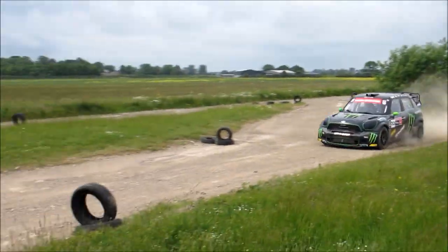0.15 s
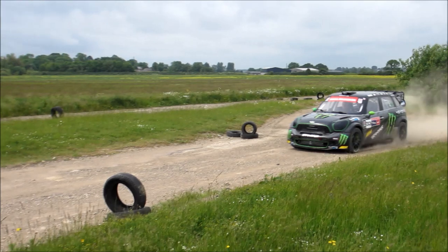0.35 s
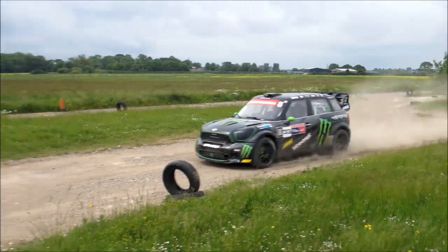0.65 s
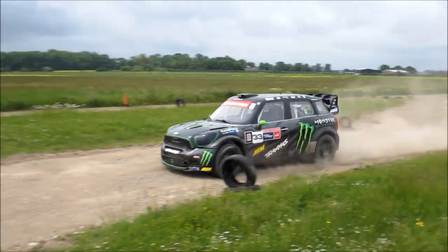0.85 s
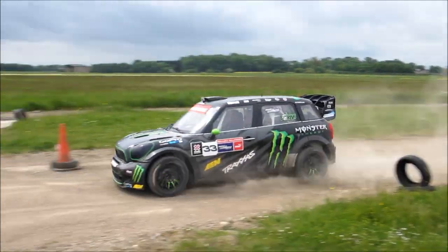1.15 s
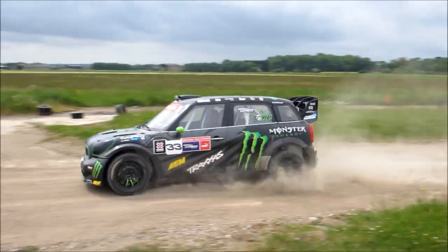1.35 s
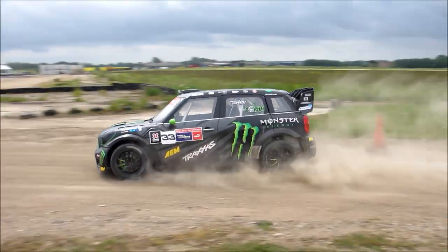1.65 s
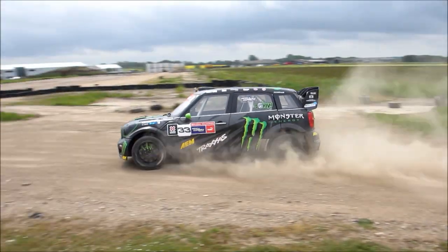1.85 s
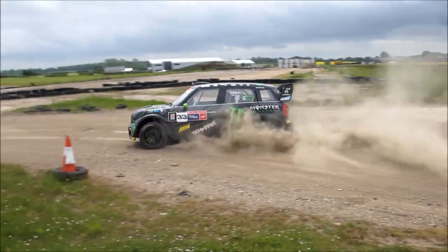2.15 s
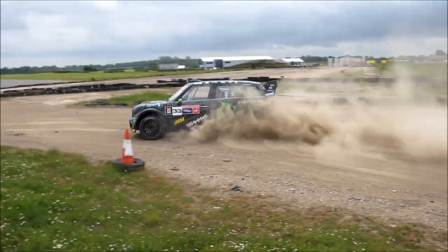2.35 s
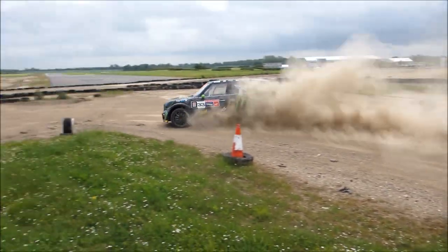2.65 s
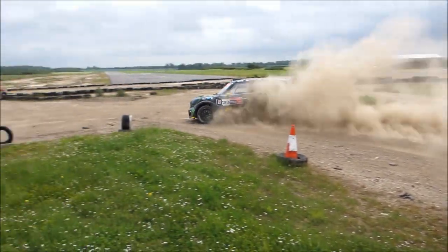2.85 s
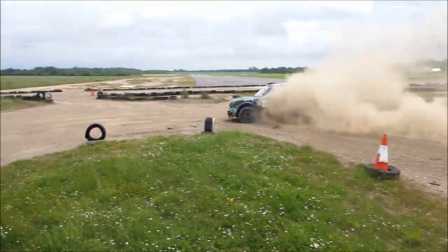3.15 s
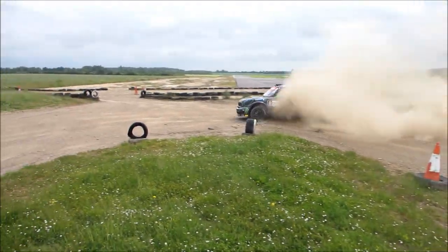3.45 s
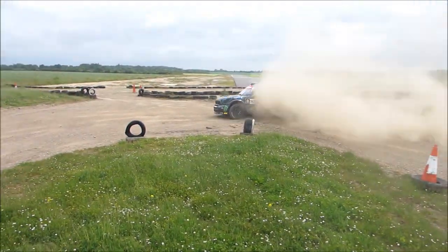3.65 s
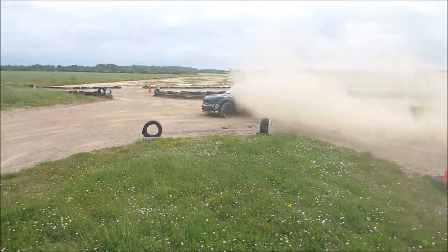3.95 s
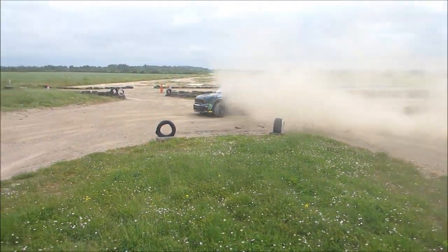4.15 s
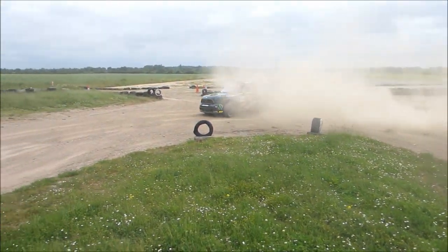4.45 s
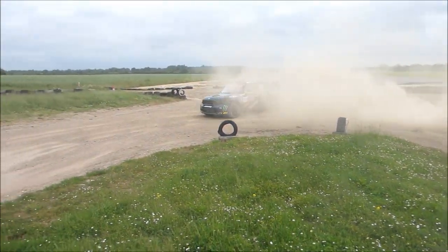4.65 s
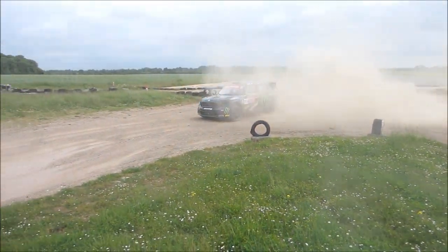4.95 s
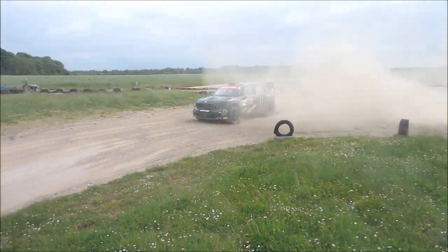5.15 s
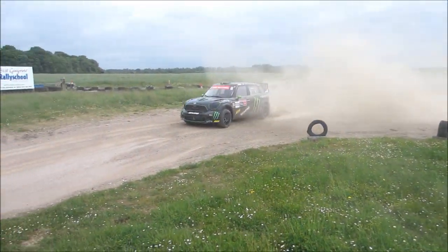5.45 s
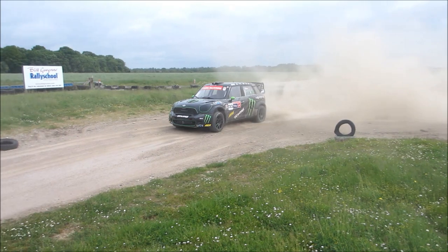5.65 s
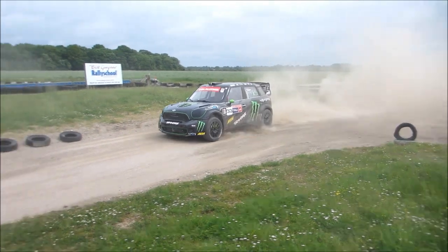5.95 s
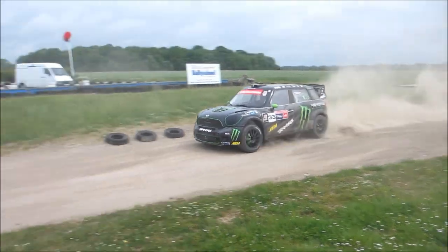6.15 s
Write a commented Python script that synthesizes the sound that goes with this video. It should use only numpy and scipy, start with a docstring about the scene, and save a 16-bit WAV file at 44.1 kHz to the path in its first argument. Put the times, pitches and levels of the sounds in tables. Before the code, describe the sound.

Outdoors on an open gravel track, a small camera microphone is buffeted by low, thumping wind throughout, strongest at the start and in sudden gusts. A rally car arrives with an uneven, raspy engine, rising at about 0.4 s with a faint high turbo whistle and grinding stones. From 1.1 to 1.9 s it lifts off: pitch sags under a dense volley of sharp exhaust pops and crackles, with a tiny thin squeal near 1.35 s. A throttle blip rasps at 1.9-2.25 s, then revs fall, with scattered pops and another squeal around 2.5-2.65 s. A second barking blip peaks at 3.2-3.4 s and drops away by 3.8 s, where a dry knock sounds. The engine catches low, hums steadily past 4 s, with small knocks at 4.6-5.2 s, then climbs in pitch and grows boomier and raspier to 6.3 s over light gravel crunch.

```python
"""Rally car on a gravel bend

A car slides round a gravel bend, lifts off with exhaust pops, blips its throttle twice and pulls away.
Firing pulses and fuel bursts excite the exhaust resonances, over a low boom and the noise of a gas jet.
Coloured grains make the gravel, wavering sines the squeals and turbo whistle, struck resonances the knocks.
A small camera on the verge hears it through two close ports; gusts buffet them in opposite senses."""
import sys
import numpy as np
from scipy import signal
from scipy.fft import rfft, irfft
from scipy.io import wavfile
from scipy.ndimage import uniform_filter1d, minimum_filter1d

SR = 44100
rng = np.random.default_rng(int(sys.argv[2]) if len(sys.argv) > 2 else 0)


def file_out(sig):
    """Save sig as 16-bit WAV at sys.argv[1]."""
    # one column per channel
    cols = np.atleast_2d(sig).T
    # limit, then scale
    lim = np.clip(cols, -1, 1)
    pcm = np.round(lim * 32767).astype(np.int16)
    wavfile.write(sys.argv[1], SR, pcm)


N = 277815  # length [samples]


def undb(db):
    """Decibel law: level [dB] to amplitude ratio."""
    return 10 ** (np.asarray(db) / 20)


def unit(x):
    """Normalisation to an rms of 1."""
    return x / np.sqrt(np.mean(x ** 2))


def curves(rows):
    """Linear interpolation in time: each column of a table, one value a sample."""
    s, *columns = np.transpose(rows)
    return [np.interp(np.arange(N) / SR, s, column) for column in columns]


def over_hz(rows):
    """Interpolation over log frequency: each column of a table, one value a transform bin."""
    hz, *columns = np.transpose(rows)
    log_bins = np.log(np.arange(N // 2 + 1) * SR / N + 1)
    return [np.interp(log_bins, np.log(hz), column) for column in columns]


def colour(x, rows, outside_db=-40):
    """Linear filtering by a spectrum table, falling away an octave beyond both ends; rms 1."""
    below = (rows[0][0] / 2, rows[0][1] + outside_db)
    above = (rows[-1][0] * 2, rows[-1][1] + outside_db)
    gain_db = over_hz([below, *rows, above])[0]
    return unit(irfft(rfft(x) * undb(gain_db), N))


def ring(x, hz, width_hz):
    """Second-order resonance, gain 1 at the centre."""
    return signal.lfilter(*signal.iirpeak(hz, hz / width_hz, fs=SR), x)


def walk(rate):
    """Bounded random modulation: levels held 1 / rate s and smoothed twice, spread near 1."""
    hold = int(SR / rate)
    steps = np.repeat(rng.standard_normal(N // hold + 1), hold)
    slewed = uniform_filter1d(uniform_filter1d(steps, hold), hold)[:N]
    return np.tanh(slewed) * 2.54


def grains(rate, spread_db):
    """Shot noise: scattered clicks of either sign, a few much larger than the rest."""
    struck = rng.random(N) < rate / SR
    return struck * rng.standard_normal(N) * undb(spread_db * rng.exponential(size=N))


# wind on the ports, before gusts: (time [s], rumble level [dB], flutter level above rumble [dB])
WIND = [(0.0, -9.5, -9), (.3, -16, -14), (.6, -15.5, -8.5), (1.0, -12, -5), (1.2, -14, -30),
        (1.8, -22.5, -8), (1.95, -11, -18), (2.17, -26, -2), (2.4, -24, -41), (2.7, -14.5, -16),
        (3.0, -18, -44), (3.3, -14, -24), (3.52, -21, -48), (3.8, -15.5, -15), (4.5, -20.5, -15),
        (4.75, -14.5, -11), (5.3, -16, -6.5), (5.8, -13, -7), (6.05, -21.5, -13), (6.3, -29, -23)]
# low eddy noise: (frequency [Hz], relative density [dB per Hz])
RUMBLE = [(25, -8.5), (50, -8.5), (90, 5.5), (180, 0), (280, 0), (450, -42)]
# higher eddy noise: (frequency [Hz], relative density [dB per Hz])
FLUTTER = [(250, 3), (450, 13.5), (700, 8), (1200, -1.5), (1900, -21)]
# sudden gusts: (time [s], rumble rise [dB], half length [s])
GUSTS = [(1.406, 7, 0.051), (2.26, 14, 0.04), (3.057, 7, 0.021), (4.006, 6.5, 0.064), (4.336, 4.5, 0.05),
         (4.566, 12.5, 0.016), (4.95, 6.5, 0.021), (6.046, 6, 0.043)]


def wind():
    """Turbulent pressure: a faster eddy passes sooner, so it is higher, louder and has more flutter."""
    flutter_per_gust_db, restless_db = 0.67, 1.2
    rumble_db, flutter_db = curves(WIND)
    t = np.arange(N) / SR
    gust_db = sum(db * np.exp(-((t - s) / half) ** 2) for s, db, half in GUSTS)
    gust_db = gust_db + restless_db * walk(12)  # small lulls and swells in between
    rumble_db = rumble_db + gust_db
    flutter_db = flutter_db + flutter_per_gust_db * gust_db
    eddy, steady = walk(80), 1.1
    speed = 2 ** (0.5 * eddy)
    place = np.cumsum(speed / speed.mean()) % (N - 1)  # noise read at the speed of the eddy
    thumps = np.interp(place, np.arange(N), colour(rng.standard_normal(N), RUMBLE))
    thumps = thumps * unit(undb(eddy))
    rumble = unit(thumps + steady * colour(rng.standard_normal(N), RUMBLE))
    flutter = colour(grains(1500, 1.6), FLUTTER) * unit(undb(1.2 * eddy + 0.6 * walk(25)))
    return undb(rumble_db) * (rumble + undb(flutter_db) * flutter)


def whine(rows, waver_hz, flicker_db, flicker_rate=55.1):
    """Phase integration: a thin tone of wavering pitch and flickering level, silent outside its table."""
    before = (rows[0][0] - 0.01, rows[0][1], -130)
    after = (rows[-1][0] + 0.009, rows[-1][1], -130)
    hz, db = curves([before, *rows, after])
    level = np.sqrt(2) * undb(db + flicker_db * walk(flicker_rate))
    return level * np.sin(2 * np.pi * np.cumsum(hz + waver_hz * walk(170)) / SR)


# faint turbo whistle, one list a glide: (time [s], frequency [Hz], mean level [dB])
WHISTLES = [
    [(.33, 13150, -68), (.42, 13200, -56), (.71, 13480, -64), (.87, 13100, -67), (1.08, 13000, -72)],
    [(4.5, 8300, -83), (5.3, 8770, -91), (5.7, 9502, -89), (6.1, 10530, -65), (6.3, 11030, -75)],
]


def turbo_whistle():
    """Gliding tones: each faint whistle is a single sine without harmonics."""
    return sum(whine(rows, waver_hz=40, flicker_db=2) for rows in WHISTLES)


# thin high squeals, one list a squeal: (time [s], frequency [Hz], mean level [dB])
SQUEALS = [
    [(1.34, 11100, -76), (1.353, 11040, -40.5), (1.385, 11036, -64)],
    [(2.495, 10790, -80), (2.515, 10650, -41), (2.54, 10510, -66), (2.65, 10750, -46.5),
     (2.665, 10850, -92)],
]


def squeals():
    """Brief pure tones: each squeal is a single sine that swells and dies."""
    return sum(whine(rows, waver_hz=50, flicker_db=2.5) for rows in SQUEALS)


# short dry knocks: (time [s], nominal peak level [dB])
KNOCKS = [(3.8066, -14), (4.565, -28.5), (4.9506, -27), (5.06, -19.5), (5.1666, -21)]


def knocks():
    """Impulse response: a click rings two damped resonances of a stiff panel for a few cycles."""
    s, peak_db = np.transpose(KNOCKS)
    clicks = np.zeros(N)
    clicks[(s * SR).astype(int)] = undb(peak_db) * SR / (2 * np.pi * 900)
    return 2 * ring(ring(clicks, 1100, 560), 1300, 480)


# tyres on loose stone, before gains: (time [s], crunch level [dB], spray level [dB])
GRAVEL = [(0, -52.5, -64), (.42, -44.5, -61), (1.05, -37.5, -59.5), (1.2, -48, -68), (1.8, -42.5, -74),
          (2.05, -37, -63.5), (2.33, -51.5, -70.5), (3.0, -51.5, -77.5), (3.3, -45.5, -66),
          (3.5, -53.5, -74.5), (4.2, -51, -78.5), (5.1, -56, -77.5), (5.7, -48.5, -70.5), (6.3, -49, -63)]
# stones grinding: (frequency [Hz], relative density [dB per Hz])
CRUNCH = [(200, 18), (800, 16), (1290, 6.5), (1480, 2.5), (3200, -8.5), (5000, -24)]
# stones pattering: (frequency [Hz], relative density [dB per Hz])
SPRAY = [(4000, -8.5), (10000, -8), (13500, -3.5), (15500, -17)]


def gravel(crunch_gain_db=11):
    """Granular impact noise: stones grind under the tyres and patter against the body."""
    crunch_db, spray_db = curves(GRAVEL)
    surge = walk(14)  # shared by both
    crunch_db = crunch_db + crunch_gain_db + 0.7 * surge + 1.2 * walk(37)
    spray_db = spray_db + 0.75 * surge + 0.45 * walk(21.85)
    crunch = colour(grains(3000, 1.5), CRUNCH) * undb(crunch_db)
    spray = colour(grains(5400, 0.36), SPRAY) * undb(spray_db)
    return crunch + 1.64 * spray


# exhaust resonances:
# (frequency [Hz], width [Hz], gain heard from behind [dB], gain heard from the front [dB])
PIPE = [(362.5, 86, 8.5, -1.5), (472.5, 120, 10, 3.5), (708, 119, 6.5, -4.5), (878, 43, 1, 1.5),
        (1067, 230, -4, -7.5), (1254, 68, -2, -4)]


def pipe(x, gains_db):
    """Modal sum: resonances of alternating sign ring; the silencer stops what lies above them."""
    rung = 0
    for k, (hz, width_hz, *_) in enumerate(PIPE):
        rung = rung - (-1) ** k * undb(gains_db[k]) * ring(x, hz, width_hz)
    return signal.sosfilt(signal.ellip(4, 1, 30, 1350, fs=SR, output="sos"), rung)


# jet at the tailpipe: (frequency [Hz], relative density [dB per Hz])
GAS = [(1500, 20), (2400, 15.5), (2850, 14.5), (3500, 4.5), (4500, -2), (9000, -15)]


def gas_jet(x):
    """Jet noise: x takes the broad spectrum of gas leaving the tailpipe; rms 1."""
    return colour(x, GAS)


# unburnt fuel going off in the exhaust: (time [s], blast peak level [dB], crack level before filter [dB])
POPS = [(0.958, -13.5, -61), (1.15, -16, -67), (1.213, -20.5, -61), (1.235, -13.5, -69),
        (1.271, -13.5, -63), (1.287, -17.5, -61), (1.328, -21.5, -63), (1.368, -16, -63),
        (1.39, -14.5, -62), (1.41, -14.5, -74), (1.444, -16.5, -58.5), (1.457, -13.5, -91),
        (1.501, -16, -58.5), (1.547, -13, -60), (1.57, -12.5, -65), (1.592, -13, -63.5), (1.637, -19, -64),
        (1.662, -13, -60), (1.685, -12.5, -64), (1.732, -10.5, -56.5), (1.757, -13.5, -57),
        (1.782, -12.5, -59), (1.823, -14.5, -53.5), (1.839, -15.5, -71), (1.865, -25, -65),
        (1.878, -13, -60), (2.48, -29, -92), (2.593, -15.5, -60.5), (2.84, -27.5, -78), (2.869, -20, -72),
        (2.897, -18, -69), (2.938, -27, -83), (2.981, -23, -63.5), (3.051, -16.5, -78), (3.069, -19.5, -73),
        (3.078, -21, -80), (3.223, -21.5, -64), (3.306, -54, -58), (3.349, -12, -87), (3.552, -22, -73),
        (3.577, -17, -88), (3.76, -24, -73), (4.034, -20.5, -87), (4.103, -23, -100)]


def pops():
    """Transient excitation: a pull, its pipe echo and a ragged burst ring the exhaust, with gas and crack."""
    burst_s, tail_s, crack_s, echo_s, pull_s = 0.004, 0.017, 0.0083, 0.00258, 0.0001
    tail_db, echo_db, thud_db, body_db = -16, 0, 0, 13
    gas_db, bright_db, gas_follows = -17, -52, 0.7  # brighter cracks bring more gas
    front = 26  # size of the pull against the ragged noise
    blast, jet, crack = np.zeros((3, N))
    t = np.arange(SR // 14) / SR
    pull = np.exp(-t / pull_s)
    fade = np.exp(-t / burst_s) + undb(tail_db) * np.exp(-t / tail_s)
    crack_fade = np.exp(-t / crack_s) + 0.76 * np.exp(-t / tail_s)
    dull = signal.butter(4, 1500, fs=SR, output="sos")  # the tailpipe's main ring carries no treble
    behind_db = np.transpose(PIPE)[2]
    for s, peak_db, crack_db in POPS:
        i = int(s * SR)
        here = slice(i, i + len(t))
        noise = rng.standard_normal((3, len(t)))
        # each pop starts elsewhere along the pipe, so its echo delay [samples] differs
        late = int(echo_s * 2 ** (0.11 * np.tanh(noise[0, -1])) * SR)
        burst = noise[0] * fade + front * (pull + undb(echo_db) * np.roll(pull, late))
        thud = undb(thud_db) * ring(burst, 109, 53)
        body = undb(body_db) * signal.sosfilt(dull, ring(burst, 677, 280))
        rung = pipe(burst, behind_db) - thud - body
        blast[here] += undb(peak_db) * rung / np.abs(rung).max()
        jet_db = peak_db + gas_db + gas_follows * (crack_db - bright_db)
        jet[here] += undb(jet_db) * noise[1] * (fade + np.roll(fade, late))
        crack[here] += undb(crack_db) * noise[2] * crack_fade
    crack = 2 * signal.sosfilt(signal.butter(2, 2400, "high", fs=SR, output="sos"), crack)
    return blast + gas_jet(jet) * np.sqrt(np.mean(jet ** 2)) + crack


# each move of the throttle holds until the next:
# (time [s], boom at first [dB], boom at last [dB], rasp at first [dB], rasp at last [dB],
#  uneven burn [0-1, clipped on use], beat on every third firing [0-1], bark [dB])
PEDAL = [(0, -34.5, -33.5, -37, -39, 1.2, 0.63, -3), (0.398, -25.5, -30.5, -29.5, -32, 0.51, 0.65, 2.5),
         (1.123, -32, -34.5, -32, -58, 1.07, 0.99, -19), (1.86, -26, -37, -26.5, -18.5, 0.22, 0.48, -0.5),
         (2.03, -46, -35, -18, -25, 0.09, 0.33, 0.5), (2.28, -41.5, -34.5, -41.5, -34.5, 0.9, 0, 8),
         (3.042, -42.5, -33, -39, -22.5, 0.04, 0.28, 18), (3.21, -30, -35, -21, -26, 0.17, 0.5, 1),
         (3.37, -42.5, -41.5, -51.5, -39.5, 1.01, 0.01, 18), (3.86, -29, -31.5, -39, -37.5, 0.11, 0, 4.5),
         (4.15, -33, -33, -39.5, -43, 0.12, 0, -3), (5.2, -32, -30.5, -40.5, -35, 0.02, 0.33, 5),
         (5.94, -28.5, -23.5, -40, -38, 0.03, 0, 0), (6.1, -30, -27, -33, -27.5, 0.13, 0.1, 1.5)]


def pedal():
    """Piecewise control: levels and unevenness follow the throttle; each move adds a decaying bark."""
    answer_s, bark_s = 0.015, 0.048  # time the engine takes to answer; decay of the bark
    t = np.arange(N) / SR
    s, boom_0, boom_1, rasp_0, rasp_1, uneven, beat, bark_db = np.transpose(PEDAL)
    k = np.clip(np.searchsorted(s, t, "right") - 1, 0, None)  # the move in force
    since = np.maximum(t - s[k], 0)
    part = since / np.diff(s, append=N / SR)[k]
    bark = bark_db[k] * np.exp(-since / bark_s)
    boom_db = boom_0[k] + part * (boom_1 - boom_0)[k] + bark
    rasp_db = rasp_0[k] + part * (rasp_1 - rasp_0)[k] + bark
    controls = np.array([boom_db, rasp_db, uneven[k], beat[k]])
    return uniform_filter1d(controls, int(answer_s * SR), mode="nearest")


# pattern over three firings, in full at beat 1: (level [dB])
CYLINDERS_DB = [0, -11, -7]


def firing_pulses(at, hz, uneven, beat, chance, slip=0.098, scatter_db=7):
    """Jittered pulse train: an uneven burn shifts and scatters firings; the beat favours every third."""
    here = at.astype(int)
    at = np.clip(at + slip * uneven[here] * chance[0, :-2] * SR / hz[here], 0, N - 2)
    pattern_db = beat[here] * np.resize(CYLINDERS_DB, len(at))
    size = undb(uneven[here] * scatter_db * chance[1, :-2] + pattern_db)
    pulses = np.zeros(N)
    # each pulse is shared between the two nearest samples
    np.add.at(pulses, at.astype(int), size * (1 - at % 1))
    np.add.at(pulses, at.astype(int) + 1, size * (at % 1))
    return pulses


# the car turns its tail to the camera and back: (time [s], nose towards the camera [0-1])
NOSE = [(1.0, 1), (1.5, 0), (3.8, 0), (4.8, 1)]


def exhaust_rasp(pulses):
    """Source directivity: firings ring the pipe, its balance moving between tail and nose; level evened."""
    nose, = curves(NOSE)
    behind_db, front_db = np.transpose(PIPE)[2:4]
    rasp = pipe(pulses, behind_db) * (1 - nose) + pipe(pulses, front_db) * nose
    return rasp / np.sqrt(uniform_filter1d(rasp ** 2, SR // 8) + 1e-12)


def exhaust_gas(turns, pulses, chance, puff=1.0, snap_db=7):
    """Modulated jet noise: each firing blows a decaying puff and snaps at the tailpipe; rms 1."""
    puffs = gas_jet(rng.standard_normal(N)) * np.exp(-(turns % 1) / puff)
    puffs = puffs * undb(2.0 * chance[2, turns.astype(int)])
    return unit(unit(puffs) - undb(snap_db) * gas_jet(pulses))


# booms of the uneven burn: (multiple of a third of the firing rate, mean level [dB] at beat 1)
THIRDS = [(1, -5.5), (2, 1), (4, -2)]


def body_boom(turns, uneven, beat, second_db=-4, second_lead=1.5):
    """Harmonic synthesis: the body booms at the firing rate, twice it, and thirds of it as the beat grows."""
    phase = 2 * np.pi * turns + 0.5 * uneven ** 2 * walk(24.89)
    thirds = sum(np.sin(k * phase / 3) * undb(db + walk(5.7)) for k, db in THIRDS)
    first = np.sin(phase) * undb(0.35 * uneven * walk(26))
    second = undb(second_db) * (1 - uneven) ** 3 * np.sin(2 * phase + second_lead)  # lead [rad]
    return first + second + beat ** 2 * thirds


# engine speed: (time [s], firing rate [Hz])
REVS = [(0, 133), (.42, 171.1), (.57, 172.5), (.64, 183.1), (.85, 175.3), (1.05, 161.1), (1.55, 133.8),
        (1.82, 129.7), (1.95, 156), (2.03, 167.1), (2.22, 181.3), (2.31, 150.4), (2.74, 89.7), (3.0, 95.88),
        (3.21, 165), (3.3, 186.3), (3.385, 187.1), (3.82, 84.24), (3.95, 91.6), (4.14, 95.5), (4.32, 93.8),
        (4.52, 99.24), (4.88, 99.5), (5.07, 105.4), (5.28, 117.4), (5.52, 126.1), (5.78, 127.8),
        (5.92, 131.9), (5.96, 138.7), (6.05, 138.2), (6.12, 145.8), (6.3, 147.6)]


def engine(gas_db=-20, muffle_db=-5):
    """Periodic excitation: one train of firings drives the exhaust rasp, the gas jet and the body boom."""
    hz, = curves(REVS)
    boom_db, rasp_db, *shares = pedal()
    uneven, beat = np.clip(shares, 0, 1)
    turns = np.cumsum(hz) / SR  # firings so far
    at = np.interp(np.arange(1, int(turns[-1])), turns, np.arange(N))  # firing instants [samples]
    # for each firing: its shift, its size and the strength of its puff
    chance = np.tanh(rng.standard_normal((N // 100, 3))[:len(at) + 2].T)
    pulses = firing_pulses(at, hz, uneven, beat, chance)
    rasp = undb(rasp_db) * exhaust_rasp(pulses)
    # gas keeps to the lowest rasp level nearby, and an uneven burn muffles it
    gas_level_db = minimum_filter1d(rasp_db, SR // 30) + gas_db + muffle_db * uneven
    gas = undb(gas_level_db) * exhaust_gas(turns, pulses, chance)
    boom = np.sqrt(2) * undb(boom_db) * body_boom(turns, uneven, beat)
    return rasp + gas + boom


# a far source at the left port against the right: (frequency [Hz], level [dB], lead [rad])
PORTS = [(120, -8, 2.9), (450, -9, 2.1), (800, -9, 1.3), (1250, -14, .4), (2000, -9, 1.7), (3200, -5, 1.4),
         (6000, -3.5, 1.3), (10700, -4, 1.4), (13500, 1, 1.3)]


def ports(far):
    """Interchannel transfer function: level and phase differ between the ports; their mean is the source."""
    db, lead = over_hz(PORTS)
    left = undb(db) * np.exp(1j * lead)
    right = 2 * rfft(far) / (1 + left)
    return irfft(np.array([left * right, right]), N)


def scene():
    """Superposition: far sources through both ports, scattered stones and wind at each port."""
    far = engine() + pops() + knocks() + gravel() + squeals() + turbo_whistle()
    # stones scatter from all round, so part of their sound differs between the ports
    scattered = np.array([gravel(crunch_gain_db=5) for _ in range(2)]) * undb(-3)
    gusts = wind() * np.array([[-undb(-4)], [1]])  # left port 4 dB lower, sign turned over
    lone = np.array([wind(), wind()]) * undb(-19)  # eddies that reach one port only
    return ports(far) + scattered + gusts + lone


def record(dry):
    """Saturation and band limiting: the camera rounds the loudest peaks and cuts the top."""
    top_hz = 16000
    rounded = np.tanh(0.74 * dry) / 0.9
    return signal.sosfilt(signal.ellip(8, 0.2, 70, top_hz, fs=SR, output="sos"), rounded)


dry = scene()
out = record(dry)
file_out(out)
```